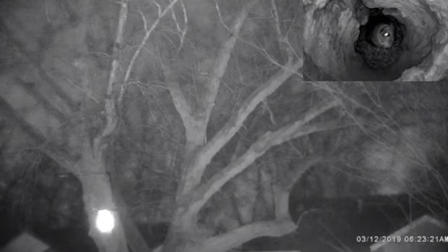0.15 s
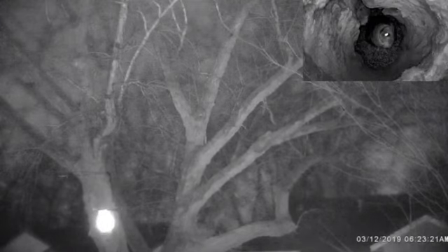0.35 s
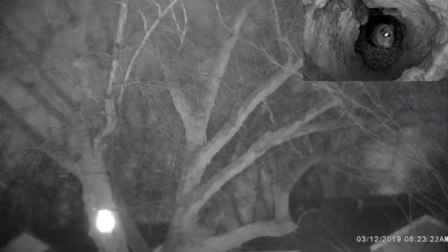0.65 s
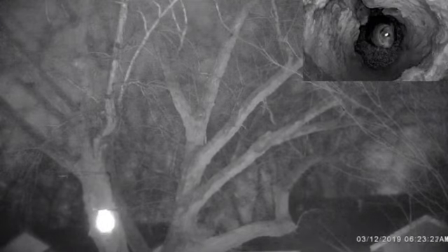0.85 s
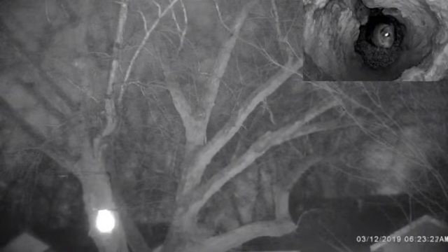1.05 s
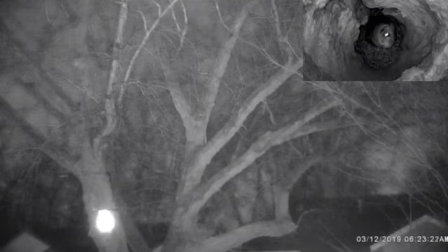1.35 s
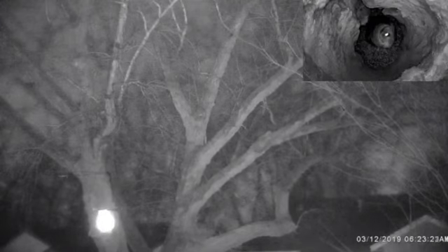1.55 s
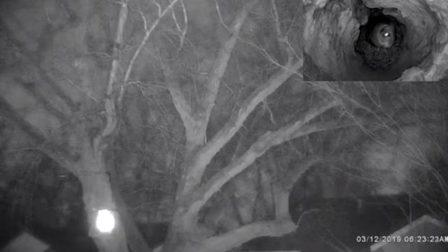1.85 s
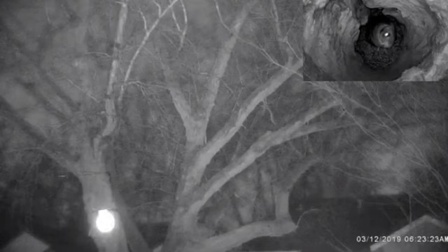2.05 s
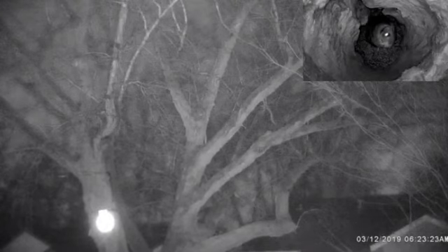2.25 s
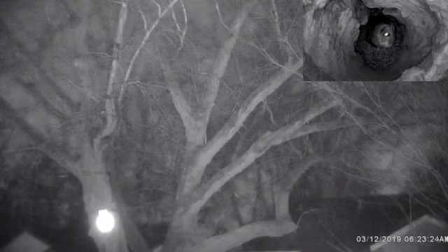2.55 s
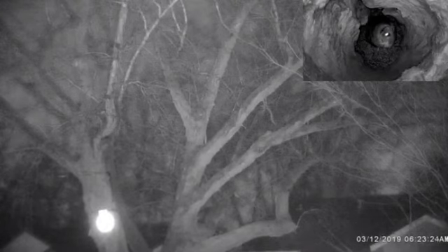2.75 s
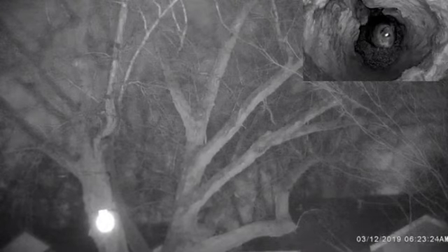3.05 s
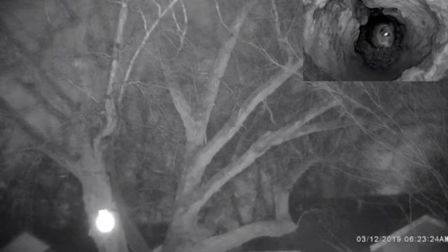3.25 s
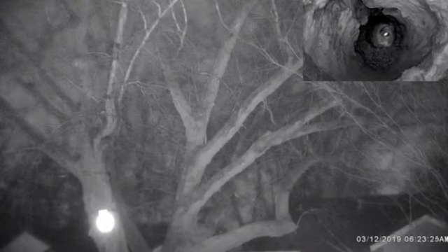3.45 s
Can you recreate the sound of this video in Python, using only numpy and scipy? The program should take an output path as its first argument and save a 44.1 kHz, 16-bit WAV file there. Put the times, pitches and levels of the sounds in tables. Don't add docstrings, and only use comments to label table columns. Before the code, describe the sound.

Owl hooting fast from a tree hollow, ending in a long wavering cry, with low wind thumps.

```python
import sys
import numpy as np
from scipy import signal
from scipy.fft import rfft, irfft
from scipy.io import wavfile
from scipy.ndimage import uniform_filter1d

SR = 44100
rng = np.random.default_rng(int(sys.argv[2]) if len(sys.argv) > 2 else 0)


def generate_wav(sig):
    pcm = np.round(np.clip(np.atleast_2d(sig).T, -1, 1) * 32767).astype(np.int16)
    wavfile.write(sys.argv[1], SR, pcm)


def volts(x):
    e = np.asarray(x, float) / 20
    return 10 ** e


N = 160965


def rms_one(x):
    return x / np.sqrt(np.mean(x ** 2) + 1e-20)


def drift(rate_hz):
    r = np.exp(-2 * np.pi * rate_hz / SR)
    white = rng.standard_normal(N + SR)
    return rms_one(signal.lfilter([1], [1, -2 * r, r * r], white)[SR:])


def coloured(spectrum):
    hz, db = np.transpose(spectrum)
    bins_hz = np.maximum(np.arange(N // 2 + 1) * SR / N, 1)
    weight = volts(np.interp(np.log(bins_hz), np.log(hz), db))
    return rms_one(irfft(rfft(rng.standard_normal(N)) * weight, N))


def resonate(x, hz, width_hz):
    r = np.exp(-np.pi * width_hz / SR)
    gain = (1 - r * r) / 2
    return signal.lfilter([gain, 0, -gain], [1, -2 * r * np.cos(2 * np.pi * hz / SR), r * r], x)


def resonate_twice(x, hz, width_hz):
    return resonate(resonate(x, hz, width_hz), hz, width_hz)


def cut(x, hz, kind, order=2):
    return signal.sosfilt(signal.butter(order, hz, kind, fs=SR, output="sos"), x)


# (f/Hz, level/dB per Hz)
HISS_SPECTRUM = [(140, -32.5), (230, -1.5), (1240, -7), (1430, -10), (1900, -15), (2170, -19.5),
                 (4250, -30), (5520, -45), (9350, -120)]
# (f/Hz, level/dB per Hz)
RUMBLE_SPECTRUM = [(15, -7.5), (30, -8.5), (50, -7.5), (62, -3.5), (80, -17.5), (140, -15.5), (230, -19),
                   (300, -48)]
# (f/Hz, rms level/dB)
HUM_TONES = [
    (59.8, -66),
    (1933, -88.5),
]


def night():
    t = np.arange(N) / SR
    hum = sum(volts(db + 4 + 0.83 * drift(1.7)) * np.sin(2 * np.pi * hz * t) for hz, db in HUM_TONES)
    hiss = volts(-71.5 + 1.5 * drift(3.8)) * coloured(HISS_SPECTRUM)
    return hiss + volts(-60) * coloured(RUMBLE_SPECTRUM) + hum


def far_whistle():
    start_s, end_s, burst_s = 0.041, 0.96, 0.051
    t = np.arange(N) / SR
    gate = np.clip(np.minimum(t - start_s, end_s - t) / 0.016, 0, 1)
    waver = volts(2.5 * drift(19))
    phase = 2 * np.pi * 1407 * np.cumsum(1 - 0.035 * t + 0.00067 * drift(23)) / SR
    level_db = -65.5 - 17 * t + 14 * np.exp(-((t - start_s) / burst_s) ** 2)
    return gate * waver * (volts(level_db) * np.sin(phase) + volts(-78) * np.sin(2 * phase))


# (t/s, level/dB)
GUST_LEVEL = [(.28, -61), (.35, -37.5), (.45, -27), (.49, -37.5), (.55, -34.5), (.66, -34.5), (.79, -40.5),
              (.85, -35), (.98, -35), (1.02, -43.5), (1.055, -37), (1.09, -56.5), (1.17, -39), (1.26, -36),
              (1.37, -55.5), (1.52, -40.5), (1.62, -48.5), (1.8, -65.5)]
# (f/Hz, level/dB per Hz)
WIND_SPECTRUM = [(12, -35), (26, -9), (60, -1), (128, -11), (173, -18), (245, -16), (500, -48.5),
                 (650, -76), (1100, -120)]


def gusts():
    s, db = np.transpose(GUST_LEVEL)
    level_db = np.interp(np.arange(N) / SR, s, db, left=-90, right=-90)
    return volts(level_db + 1.5 * drift(54)) * coloured(WIND_SPECTRUM)


# (t/s, peak level/dB, f/Hz)
BUFFETS = [(0.361, -18.5, 80.7), (0.403, -18.5, 89), (0.427, -17, 57.8), (0.438, -16.5, 67.6),
           (0.449, -15, 80), (0.46, -17, 100), (0.502, -28, 72), (0.552, -21.5, 79.7), (0.566, -29, 79.7),
           (0.638, -26, 36.8), (0.664, -27.5, 93), (0.717, -21.5, 60.6), (0.762, -23.5, 84),
           (0.818, -21.5, 116), (0.837, -22, 90), (0.851, -12, 101.8), (0.876, -29, 90.7), (0.895, -17, 99),
           (0.911, -21.5, 71), (0.935, -26.5, 79), (0.964, -20.5, 134), (0.982, -21, 100), (1.045, -32, 50),
           (1.164, -23, 87.5), (1.189, -18, 86.8), (1.217, -29, 73), (1.251, -18.5, 99.9), (1.282, -28, 80),
           (1.44, -18.5, 106), (1.522, -19.5, 82), (1.539, -28, 73.4)]


def buffets():
    out = np.zeros(N)
    width_cycles = 0.41
    splash = cut(rng.standard_normal(N), 263, "low", order=5)
    start_phases = rng.uniform(0, 2 * np.pi, len(BUFFETS))
    t = np.arange(-1500, 1500) / SR
    for (s, db, hz), start_phase in zip(BUFFETS, start_phases):
        i = int(s * SR) + np.arange(-1500, 1500)
        hump = np.exp(-np.abs(t * hz / width_cycles) ** 2)
        out[i] += volts(db) * hump * np.cos(2 * np.pi * hz * t + start_phase)
        out[i] += volts(2 * db + 20) * hump * splash[i]
    return out


# (t/s, level/dB, top f/Hz)
HARD_KNOCKS = [(.361, -39.5, 600), (.404, -47, 600), (.439, -38.5, 600), (.456, -36, 764),
               (0.651, -37.5, 400), (.716, -48, 330), (0.764, -51, 330), (.952, -40.5, 412),
               (.98, -42, 395), (1.05, -46, 389), (1.07, -47, 400), (1.278, -43, 330)]


def knocks():
    out = np.zeros(N)
    t = np.arange(-1500, 1500) / SR
    hump = np.exp(-(t / 0.0063) ** 2)
    for s, db, top_hz in HARD_KNOCKS:
        dull = cut(rng.standard_normal(3000), [110, top_hz], "band", order=6)
        out[int(s * SR) - 1500:int(s * SR) + 1500] += volts(db) * hump * rms_one(dull)
    return out


# (t/s, level/dB, f/Hz, 60 dB decay time/s)
HOUSING_TICKS = [(.360, -62, 3550, 0.013), (.403, -41, 4290, 0.018), (0.403, -49, 3300, 0.022),
                 (.442, -62, 3700, 0.025), (.455, -52, 4050, 0.015), (0.463, -62, 3930, 0.017),
                 (0.864, -56.5, 5150, 0.087), (.864, -59, 6000, 0.05), (.864, -62, 7200, .04),
                 (2.088, -62.5, 5150, .07), (1.096, -66, 3628, 0.01)]


def ticks():
    out = np.zeros(N)
    t = np.arange(3000) / SR
    for s, db, hz, t60 in HOUSING_TICKS:
        decay = volts(db + 25.5 - 60 * t / t60) * np.minimum(t / 0.0014, 1)
        burst = decay * rng.standard_normal(3000)
        out[int(s * SR):int(s * SR) + 3000] += resonate_twice(burst, hz, 0.12 * hz)
    return out


def trees(calls):
    t60_s = 0.11
    t = np.arange(N) / SR
    fading = volts(-60 * t / t60_s) * rng.standard_normal(N)
    response = fading[:SR // 2] / np.linalg.norm(fading)
    tail = signal.fftconvolve(calls, response)[:N]
    earlier_call = 5 * cut(fading, [150, 1000], "band")
    return volts(-20) * tail + volts(-53) * earlier_call


# (start t/s, time to the turn/s, length/s, top f/Hz, level/dB)
HOOTS = [
    (0.2, 0.072, 0.11, 343, -21),
    (0.508, 0.076, 0.12, 411, -22),
    (0.815, 0.081, 0.12, 432.7, -20.5),
    (1.123, 0.085, 0.12, 423.7, -20.5),
    (1.433, 0.082, 0.13, 348.2, -21),
    (1.749, 0.086, 0.14, 413.7, -20.5),
    (2.049, 0.08, 0.14, 415, -22),
    (2.367, 0.081, 0.14, 427.4, -22),
    (2.698, 0.082, 0.15, 419, -23.5),
]
# (t/s after the start, level/dB)
SWELL = [(0, -6), (0.014, 0), (.025, 2.5), (.035, 3), (.045, 2.04), (.065, 2)]
# (share of remaining time, share of pitch range, level/dB)
SAG = [(.12, .93, -4), (.3, .62, -10), (.52, .3, -5.5), (0.721, .05, -11.5), (1.001, 0.0092, -16)]
CLIMB = [(175.6, 218, 256, 295, 336), (180.5, 220, 264, 312, 367), (188.4, 238, 279, 331, 378),
         (196.3, 242, 295, 341, 390), (198.9, 234, 310, 315, 341), (193.7, 234, 320, 336, 383),
         (187, 227, 279, 344, 400), (201.1, 242, 288, 339, 404), (195, 250, 340, 352, 400)]
LOSS = [-4.5, -4, -4, -3.5, -3, -2.54, 0.4, -0.5, 1]
# (t/s, f/Hz, level/dB)
HELD = [
    (2.858, 151.1, -26.5),
    (2.885, 261.4, -22),
    (2.898, 329.9, -25.5),
    (2.918, 497.5, -23.5),
    (2.935, 588, -28.5),
    (2.975, 618.9, -23.5),
    (3.05, 609.5, -23.5),
    (3.07, 579, -20),
    (3.092, 547.4, -23),
    (3.1, 449.4, -23.5),
]
# (t/s, f/Hz, level/dB)
FALLING = [
    (3.107, 283.7, -29),
    (3.136, 279.8, -23.5),
    (3.17, 237.3, -24.5),
    (3.253, 210.3, -26.5),
    (3.331, 164.9, -25.5),
    (3.394, 130.8, -26.5),
]


def call_contours():
    catch_hz, slack_hz, turn_db = 147.44, 134, -4
    for (s, turn, length, hz, db), climb, loss_db in zip(HOOTS, CLIMB, LOSS):
        rows = []
        for (u, d), pitch in zip(SWELL, (catch_hz, *climb)):
            rows.append((s + u, pitch, db + d + loss_db * u / turn))
        rows.append((s + turn, hz, db + turn_db + loss_db))
        for u, p, d in SAG:
            when = s + turn + u * (length - turn)
            rows.append((when, slack_hz + p * (hz - slack_hz), db + d + loss_db * (1 - u)))
        yield rows
    yield HELD + FALLING


HARSHNESS = [-2, -1, 3.5, -2, 2.5, -1, 0.5, 0.5, -4, -3]
PUFF_LEAD_S = 0.027


def voice_source():
    soft, sharp, air, puff, buzz, harsh, shrill = np.full((7, N), 1e-18)
    wobble = drift(80)
    k = np.arange(1, 33)[:, None]
    break_s, tire_s, shrill_s = FALLING[0][0], FALLING[2][0], 2.93
    for rows, harsh_db in zip(call_contours(), HARSHNESS):
        s, hz, db = np.transpose(rows)
        last = s[0] == HELD[0][0]
        i = np.arange(int(s[0] * SR), int(s[-1] * SR))
        t = i / SR

        def smooth(values):
            return uniform_filter1d(np.interp(t, s, values), size=260, mode="nearest")

        # 17.1 swings per second, 10 percent in pitch and 1 dB in level
        swing = (t > HELD[-1][0]) * np.cos(2 * np.pi * 17.1 * np.maximum(t - 3.132, 0))
        f = smooth(hz) * (1 + 0.1 * uniform_filter1d(swing, size=260) + 0.004 * wobble[i])
        phase = 2 * np.pi * (np.cumsum(f) / SR - 0.25)
        waves = np.cos(k * phase) * (k * f < 7800)
        edge = np.clip(np.minimum((t - s[0]) / 0.002, (s[-1] - t) / 0.0033), 0, 1)
        level = volts(smooth(db) + 3 + swing) * edge

        soft[i] = level * np.sum(volts(-5.5 * np.log2(k)) * waves, axis=0)
        sharp[i] = level * np.sum(volts(12 * last - 5 * np.log2(k)) * waves, axis=0)
        if last:
            effort = np.clip((t - shrill_s) / 0.033, 0, 1) * np.clip((f - 205) / 100, 0, 1) ** 2
            shrill[i] = sharp[i] * effort * volts(7 * (t > break_s))
            tired_db = -30.5 * np.maximum(t - tire_s, 0)
            sharp[i] *= volts(1.5 * swing + tired_db) * np.clip((t - shrill_s) / 0.03 + 1, 0.2, 1)
        else:
            shrill[i] = 0
            sharp[i] *= np.minimum(f / 300, 1) ** 2

        harsh[i] = volts(harsh_db - 8 * (t > break_s))
        since = t - s[0]
        early = harsh[i] * level * np.exp(-(since / 0.052) ** 2) * np.minimum(since / 0.019, 1)
        air[i] = 5 * early * (1 + waves[0]) ** 3.3
        buzz[i] = early * np.sum(waves / k, axis=0)
        lead = int(PUFF_LEAD_S * SR)
        puff[i[0] - lead:i[0]] = np.sin(np.linspace(0, 2.4, lead))
    return soft, sharp, shrill, air, puff, buzz, harsh


# (f/Hz, width/Hz, level/dB)
THROAT = [(353, 230, -4.5), (476.4, 106.2, 6.5), (720, 480, -19.5)]


def throat(soft):
    soft = cut(soft, 191, "high")
    rung = sum(volts(db) * resonate(soft, hz, width) for hz, width, db in THROAT)
    return cut(rung, 836, "low", order=5)


# (f/Hz, width/Hz, level/dB)
UPPER = [(1416, 240, -37.5), (2576, 260, -26.5)]
# (f/Hz, width/Hz, level/dB)
SHRILL = [(3180, 350, -37), (4320, 80, -47), (5250, 100, -40.5), (7440, 150, -32.5)]


def upper_resonances(sharp, shrill):
    ring = sum(volts(db) * resonate_twice(sharp, hz, width) for hz, width, db in UPPER)
    return ring + sum(volts(db) * resonate_twice(shrill, hz, width) for hz, width, db in SHRILL)


NOISE_TOP = [2750, 4500, 4600, 4600, 4600, 4500, 4600, 4900, 4100, 3750]


def call_noise(voice, air, puff, buzz, harsh):
    low_hz, high_hz = 920, 4650
    rasp = rng.standard_normal(N) * harsh * np.abs(5 * voice) ** 3.4
    rasp = cut(cut(rasp, [low_hz, high_hz], "band", order=3), low_hz, "low", order=1)
    breath = cut(resonate(air * rng.standard_normal(N), 2400, 1500), high_hz, "low", order=4)
    puffs = cut(puff * rng.standard_normal(N), [300, 1200], "band", order=3)
    bright = cut(buzz, [low_hz, high_hz], "band", order=3)
    noise = volts(-53) * breath + volts(-44.5) * puffs + volts(-16.5) * bright + volts(-26.5) * rasp
    starts = [int((rows[0][0] - PUFF_LEAD_S) * SR) for rows in call_contours()] + [N]
    parts = [noise[:starts[0]]]
    for a, b, top_hz in zip(starts, starts[1:], NOISE_TOP):
        parts.append(cut(noise[a:b], top_hz, "low", order=12))
    return np.concatenate(parts)


def owl():
    soft, sharp, shrill, air, puff, buzz, harsh = voice_source()
    voice = throat(soft)
    tone = voice + upper_resonances(sharp, shrill)
    hollow = 0.93 * resonate(tone, 1960, 350)
    return tone - hollow + call_noise(voice, air, puff, buzz, harsh)


def scene():
    bird = owl()
    background = night() + far_whistle()
    microphone = gusts() + buffets() + knocks() + ticks()
    return (background + microphone + trees(bird) + bird)[None]


def top_cut(x):
    return signal.sosfilt(signal.butter(12, 8000, fs=SR, output="sos"), x)


def record(dry):
    skew, ceiling, cutoff_hz = 0.036, 0.27, 1208
    bent = (dry - skew * dry ** 2) / (1 + (dry / ceiling) ** 6) ** (1 / 6)
    finished = cut(bent, cutoff_hz, "low", order=1)
    return top_cut(finished)


dry = scene()
out = record(dry)
generate_wav(out)
```